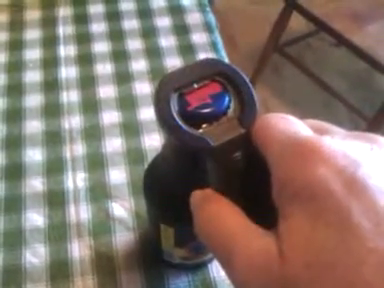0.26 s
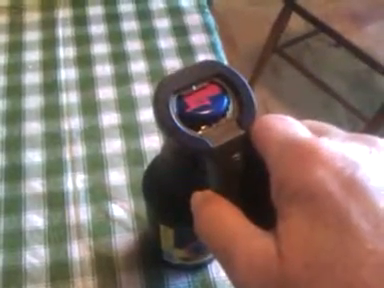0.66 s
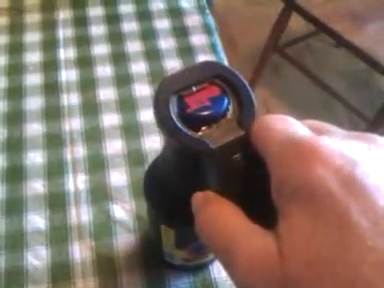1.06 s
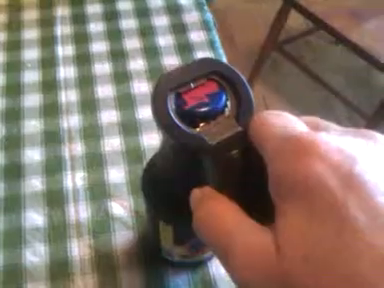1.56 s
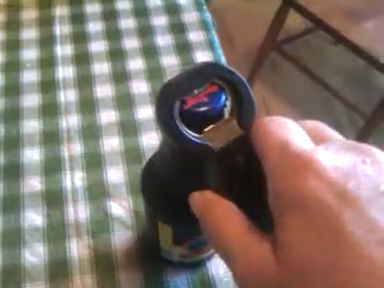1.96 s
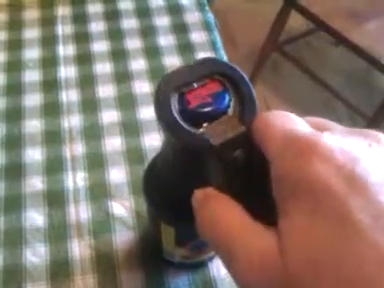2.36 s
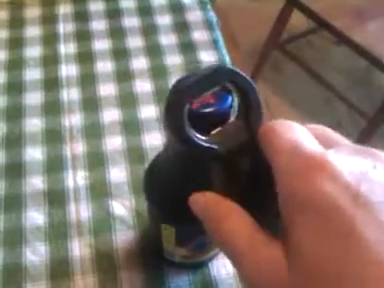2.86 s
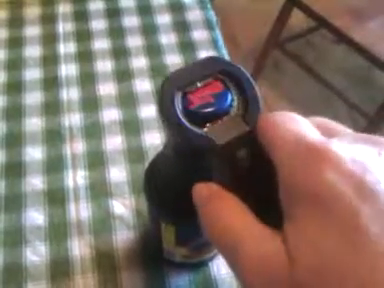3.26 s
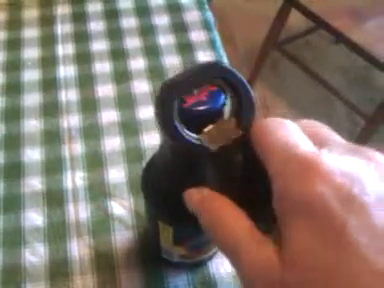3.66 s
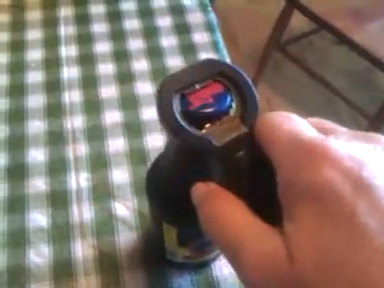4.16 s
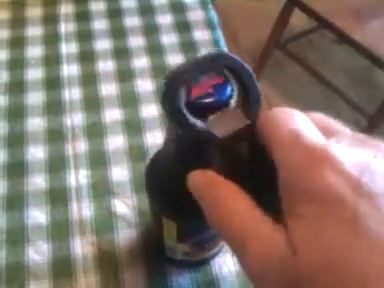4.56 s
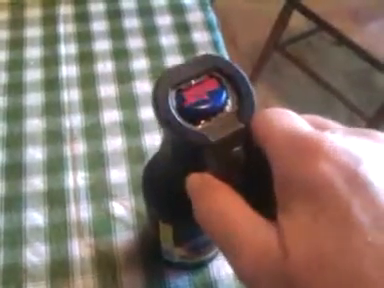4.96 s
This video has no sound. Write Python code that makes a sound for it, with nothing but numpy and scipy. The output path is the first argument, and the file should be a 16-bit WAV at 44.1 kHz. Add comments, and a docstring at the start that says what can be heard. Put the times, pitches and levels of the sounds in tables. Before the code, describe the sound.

Quiet small room, low airy hiss and a faint wavering appliance hum throughout. From 0 to 1.3 s fingers rub the handheld camera right at the microphone: four rough, stuttering strokes at about 0-0.33, 0.46-0.73, 0.78-0.96 and 1.03-1.26 s, with light brushes between. They rasp and buzz with a hollow, nasal resonance near 750 Hz, sometimes turning into a brief hoot. Then near quiet until a soft scrape at 1.85 s. A metal opener touches a bottle's crown cap: scrape at 2.19 and tick at 2.26, tick and longer scrape at 2.74, clicks at 3.15 and a strong one at 3.28, lighter 3.78, clear 4.04, gentle contact and scrape at 4.45-4.58, strong double click at 4.78. Ticks are short, dry and metallic with tiny rebounds, soft table thuds and faint room reflections. Treble is cut above roughly 7 kHz. The cap is never released.

```python
"""A small room lies under a low hiss, and an appliance hums, all built from filtered noise and wavering tones.
Fingers rub four times, with light brushes between, on a hand-held camera close to its microphone:
skin that sticks and slips shakes the shell and the hollow of the case, which at times hoots.
Then a bottle opener scrapes (tiny slips) and ticks (short ringing blows) on the crown cap
of a beer bottle on a table, and the room answers faintly with sparse reflections."""
import sys
import numpy as np
from scipy import signal
from scipy.fft import rfft, irfft
from scipy.io import wavfile
from scipy.ndimage import uniform_filter1d

SR = 44100
rng = np.random.default_rng(int(sys.argv[2]) if len(sys.argv) > 2 else 0)


def to_wav(sig):
    """Store sig (one row per channel, or 1-D mono) as 16-bit WAV at the path in sys.argv[1].

    Samples outside -1..1 are clipped; the rate is SR.
    """
    pcm = np.clip(np.atleast_2d(sig), -1, 1) * 32767
    pcm = np.round(pcm).astype(np.int16)
    wavfile.write(sys.argv[1], SR, pcm.T)  # frames by channels


N = 230510
TIME = np.arange(N) / SR


def amp(db):
    """Turns decibels into a gain."""
    return 10 ** (np.asarray(db) / 20)


def unit(x):
    """Scales a signal to an rms (average strength) of 1."""
    return x / np.sqrt(np.mean(x ** 2) + 1e-20)


def read(points, hz):
    """Reads a table of (Hz, value) between its points, over log frequency."""
    f, value = np.transpose(points)
    return np.interp(np.log(hz + 1), np.log(f + 1), value)


def colour(x, points):
    """Filters a sound by a table of (Hz, dB)."""
    gain = amp(read(points, np.fft.rfftfreq(len(x), 1 / SR)))
    return irfft(rfft(x) * gain, len(x))


def drift(hz):
    """A random wander of rms 1 that moves no faster than about hz."""
    lowpass = 1 + (np.fft.rfftfreq(N, 1 / SR) / hz) ** 4
    return unit(irfft(rfft(rng.standard_normal(N)) / lowpass, N))


def sine(hz, t):
    """A steady pure tone."""
    return np.sin(2 * np.pi * hz * t)


def resonate(x, hz, width):
    """One resonance with a gain of 1 at its peak; a narrow width (Hz) rings longer."""
    return signal.lfilter(*signal.iirpeak(hz, hz / width, SR), x)


def add(mix, s, sound):
    """Lays a sound into the mix at time s (seconds)."""
    part = mix[max(round(s * SR), 0):][:len(sound)]
    part += sound[:len(part)]


def held(x):
    """Friction limits how far a rubbed body can swing, so loud moments are evened out."""
    power = uniform_filter1d(unit(x) ** 2, size=800)
    return unit(x / np.sqrt(0.13 + power))


def slips(rate_hz, jitter, spread_db, fade, grit):
    """Stick and slip: uneven jerks of uneven size, each trailed by a spray of grit (fade in seconds)."""
    turns = np.cumsum(rate_hz * np.exp(jitter * drift(200))) / SR
    sizes = amp(spread_db * np.clip(rng.standard_normal(N), -2, 2))
    # a jerk falls wherever the count of turns passes a whole number
    jerks = np.diff(np.floor(turns), prepend=0) * sizes
    trail = signal.lfilter([1], [1, -np.exp(-1 / (fade * SR))], jerks)
    spray = trail * rng.standard_normal(N)
    return unit(unit(jerks - jerks.mean()) + grit * unit(spray))


def background():
    """Room air, low rumble and microphone hiss are filtered noise; an appliance hums in wavering tones."""
    # Colour of the room air. Each row: frequency in Hz, relative level in dB per Hz.
    air_colour = [(76, -37.5), (130, -24.5), (146, -14.5), (173, -5), (259, -9), (415, -3.5), (453, -6),
                  (940, -11.5), (1580, -11.5), (4000, -22), (5200, -26.5), (8800, -120)]
    # Colour of the microphone hiss. Each row: frequency in Hz, relative level in dB per Hz.
    hiss_colour = [(20, -58), (100, -56), (200, -54.5), (2500, -13), (4100, -8.5), (4500, 0.5), (4750, 4),
                   (5200, -5.5), (5700, -6), (7200, -11.5)]
    # Tones of the appliance. Each row: middle frequency in Hz, middle level in dB.
    hum_tones = [(59.3, -79.5), (84.4, -74.5), (119.5, -78), (183.5, -85.5), (319, -74.5), (421, -80)]
    rumble_colour = [(15, -11.5), (50, -3.5), (110, -13.5), (200, -10.0), (600, -37.5)]

    air = amp(-62) * unit(colour(rng.standard_normal(N), air_colour)) * amp(0.89 * drift(6))
    rumble = amp(-76.5) * unit(colour(rng.standard_normal(N), rumble_colour))
    hiss = amp(-67.0) * unit(colour(rng.standard_normal(N), hiss_colour))
    hum = np.zeros(N)
    for hz, db in hum_tones:
        level = amp(db + 1.0 * drift(2.8)) * np.sqrt(2)
        turns = np.cumsum(hz * (1 + 0.01412 * drift(5.1))) / SR
        hum += level * np.sin(2 * np.pi * turns)
    return air + rumble + hiss + hum


def room(x, decays):
    """Sparse reflections of random sign, each band dying at its own speed."""
    first = TIME[:SR // 2]
    signs = rng.choice([-1., 1.], SR // 2)
    # about 3000 reflections a second, none in the first 5 ms
    taps = signs * (rng.random(SR // 2) < 3000 / SR) * (first > .005)
    hz, t, bands = signal.stft(taps, SR, nperseg=256)
    fading = amp(-60 * t / read(decays, hz)[:, None])
    tail = signal.istft(bands * fading, SR, nperseg=256)[1]
    return signal.fftconvolve(x, tail / np.linalg.norm(tail))[:N]


def contact(cap_hz, knock, rim, edge):
    """Each contact rings the same modes; where the opener lands sets their shares and the pitch of the cap."""
    # Opener, cap and bottle ring together.
    # Each row: frequency in Hz, level in dB before the shares, time to fall by 60 dB in seconds.
    ring_modes = [(296, -13, 0.05), (495, -12.5, 0.023), (639, 0, 0.034), (1190, -10.5, 0.021),
                  (1266, -14, 0.074), (1555, -31, 0.33), (1832, -17, 0.06), (2250, -12, 0.033),
                  (2920, -1, 0.015), (3380, -0.5, 0.021), (3458, -9, 0.024), (3670, 1.5, 0.0049),
                  (5340, -2, 0.007), (6900, 12, 0.0092), (7070, -7, 0.0064)]
    t = np.arange(SR // 3) / SR
    # (Hz, dB): low knock, middle, rim and thin edge
    shares = [(650, knock), (1100, 0.014), (1900, 0.033), (2900, rim), (4000, rim), (6500, edge)]
    modes = list(ring_modes) + [(cap_hz, -1, 0.032)]
    ring = np.zeros(len(t))
    for k, (hz, db, t60) in enumerate(modes):
        # every second mode starts the other way round
        ring += (-1) ** k * amp(db + read(shares, hz) - 60 * t / t60) * sine(hz, t)
    crack = colour(rng.standard_normal(len(t)), shares) * amp(3 - 60 * t / 0.027)
    return (ring + crack) * (1 - np.exp(-t / 0.00027))


def scrapes(catches_per_s=45, catch_db=-6.5):
    """Steel drags over the crimps of the cap in tiny slips and catches, and the opener sings faintly."""
    # The slides of the opener. Each row: start in seconds, length in seconds, level in dB before the singing.
    slides = [(1.85, 0.045, -66), (2.186, 0.062, -60), (2.747, 0.016, -59), (2.756, 0.11, -64),
              (2.988, 0.014, -67), (3.125, 0.009, -57.5), (3.269, 0.011, -57), (3.767, 0.036, -66),
              (3.946, 0.062, -65.5), (4.512, 0.065, -58.5), (4.738, 0.018, -59.5), (4.769, 0.0044, -55)]
    # Colour of the sliding. Each row: frequency in Hz, relative level in dB.
    slide_colour = [(100, -23), (280, 9.5), (600, 14.5), (850, 0), (1300, 12), (1650, 1), (2300, -10),
                    (3300, 0.5), (4100, -8), (5800, -12.5), (7000, -43)]
    stroke = np.zeros(N)
    for s, length, db in slides:
        add(stroke, s, amp(db) * signal.windows.tukey(int(length * SR), .5))
    drive = slips(rate_hz=480, jitter=.5, spread_db=0.5, fade=0.0028, grit=1.2)
    grains = stroke * held(colour(drive, slide_colour))
    singing = 8.3 * resonate(grains, 1625, 22) + 1.8 * resonate(grains, 3450, 90)
    # while it slides, the steel catches on single crimps
    moments = stroke * (rng.random(N) < catches_per_s / SR)
    catches = signal.oaconvolve(moments, contact(1630, 0, -3, -1))[:N]
    return grains + singing + amp(catch_db) * catches


def thud(hz, t60=0.086):
    """The table top answers with a soft, low note (t60: seconds to fall by 60 dB)."""
    t = np.arange(SR // 3) / SR
    return amp(-60 * t / t60) * sine(hz, t) * (1 - np.exp(-t / 0.002))


def ticks(metal_db=3.5, table_lag_s=0.0013, rebound_edge_db=-19):
    """Each blow is a contact, a weaker rebound, and a thud passed down the bottle into the table."""
    # The opener hits the cap and rebounds.
    # Each row: start in seconds, strength in dB (metal_db is added for the metal), pitch of the cap in Hz,
    # pitch of the table in Hz, wait before the rebound in seconds, rebound in dB over the first contact,
    # table thud in dB over the strength, then the shares of low knock, rim and thin edge in dB
    # (rebound_edge_db is added to the edge of the rebound).
    blows = [(2.2572, -49.5, 1640, 322, 0.0035, -17, -20, 3.5, -1.5, -14),
             (2.737, -52.5, 1384, 310, 0.0069, -11, -13, -1.5, -17, -27),
             (3.152, -45, 1610, 266, 0.0022, -7, -6.5, 2, -2, -6.5),
             (3.275, -36, 1236, 292, 0.0061, -12.5, -14, -20.5, -8, -24),
             (3.779, -47.5, 1620, 330, 0.005, -8, -12, -7.5, -7.5, -20.5),
             (4.0392, -41, 1600, 323, 0.0106, -10, -16, -1.5, -3, -18.5),
             (4.453, -51.5, 1475, 288, 0.00393, -12.5, 3.5, 7, -9, -22),
             (4.534, -67, 1590, 285, 0.031, -3, 9.5, 7, -9, -16),
             (4.7785, -37.5, 1297, 241, 0.0127, -1.5, -12, -7.5, -9.5, -2.5)]
    out = np.zeros(N)
    for s, db, cap_hz, table_hz, rebound_s, rebound, table, knock, rim, edge in blows:
        first = contact(cap_hz, knock, rim, edge)
        # the second contact is duller at the thin edge
        second = contact(cap_hz, knock, rim, edge + rebound_edge_db)
        add(out, s, amp(db + metal_db) * first)
        add(out, s + rebound_s, amp(db + metal_db + rebound) * second)
        add(out, s + table_lag_s, amp(db + table) * thud(table_hz))
    return out


def pressure(start, length, rise, sag_db):
    """Gain of one stroke: it rises, holds while sagging, drops as the skin lifts and rings out."""
    t = TIME - start
    after = np.maximum(t - length, 0)
    # the pressure holds at first and eases late in a stroke (a negative sag grows instead)
    hold = amp(-sag_db * np.clip(t / length, 0, 1) ** 3.6)
    # as the skin lifts, the sound drops at once, then dies away by 135 dB a second
    release = np.maximum(np.exp(-after / 0.016), amp(-8.5 - 135 * after))
    return np.clip(t / rise, 0, 1) * hold * release


def rubbing(hollow_sag_db=2, hollow_rise=0.92):
    """All strokes as three controls: gain of the rasp, gain of the hollow, slips a second."""
    # Four full strokes of the fingers with light brushes between them.
    # Each row: start in seconds, length in seconds, rise in seconds (hollow_rise times that for the hollow),
    # rasp in dB, hollow in dB before its overall trim, sag by the end in dB (hollow_sag_db more for the hollow),
    # slips a second at the start, slips a second at the end.
    strokes = [(-0.02, 0.35, 0.025, -37.5, -36, 0.5, 250, 165),
               (0.368, 0.038, 0.026, -48.5, -43, 0, 200, 198),
               (0.463, 0.269, 0.062, -36.5, -33.5, 8, 280, 264),
               (0.742, 0.031, 0.015, -56, -48.5, -3.5, 200, 200),
               (0.782, 0.176, 0.036, -39.5, -34, -2.4, 170, 155),
               (1.032, 0.226, 0.038, -40, -35, -0.5, 235, 205),
               (1.262, 0.074, 0.0093, -49, -49.5, 9.5, 280, 234)]
    rasp, hollow = np.zeros(N), np.zeros(N)
    rate = np.full(N, float(strokes[0][6]))
    for start, length, rise, rasp_db, hollow_db, sag_db, first, last in strokes:
        rasp_stroke = amp(rasp_db) * pressure(start, length, rise, sag_db)
        hollow_stroke = amp(hollow_db) * pressure(start, length, rise * hollow_rise, sag_db + hollow_sag_db)
        rasp, hollow = np.hypot(rasp, rasp_stroke), np.hypot(hollow, hollow_stroke)
        glide = np.interp(TIME, [start, start + length], [first, last])
        rate = np.where(TIME < start, rate, glide)
    return rasp, hollow, rate


def fingers(shell_width_hz=18, inside_db=-1, hollow_trim_db=-1.75, hoot_hz=747.8):
    """Skin slips on the case: a rasp from its shell and a muffled note from its hollow."""
    # Slow slips come regularly, fast ones do not. Each row: slips a second, unevenness from 0 to 1.
    unevenness = [(160, 0.08), (185, 0.3), (240, 0.46)]
    # Colour of the case. Each row: frequency in Hz, relative level in dB per Hz.
    case_colour = [(620, -42.5), (1050, -3), (1320, -7), (1480, -6.5), (1640, -9.5), (1800, -3), (2050, -7),
                   (2570, -3), (2880, 5), (3350, -13), (4560, -16.5), (5340, -32.5), (7000, -39),
                   (9100, -69), (15400, -120)]
    # Narrow modes of the shell. Each row: frequency in Hz, level in dB over the colour of the case.
    shell_modes = [(1497, -1), (1750, -12), (1868, -0.5), (1943, -13), (2137, -4.5), (2254, 2), (2320, 1.5),
                   (2403, 6.5), (2720, 2), (2780, -3.5), (2918, -15), (3092, -6), (3185, -0.5),
                   (4026, -1.5)]
    # Dense ringing inside the case. Each row: frequency in Hz, time to fall by 60 dB in seconds.
    inside_decays = [(1000, 0.23), (5000, 0.62)]
    # Resonances of the hollow. Each row: frequency in Hz, width in Hz, middle level in dB.
    cavity = [(744.7, 29, 5), (869, 10.6, 2.5), (796, 82, -2), (692, 126, -12.5), (1020, 230, -29.5),
              (545, 38.6, -24), (394, 48, -18), (347, 13, -23.5)]
    # The skin locks onto the hollow and hoots. Each row: start in seconds, length in seconds, level in dB.
    hoots = [(0.074, 0.056, -29.5), (0.611, 0.054, -31), (1.045, 0.01413, -33), (1.165, 0.042, -32.5)]

    rasp_gain, hollow_gain, rate_hz = rubbing()
    uneven = read(unevenness, rate_hz)
    drive = slips(rate_hz, uneven, spread_db=1.6, fade=0.011, grit=0.4 + 3.2 * uneven)

    shell = colour(drive, case_colour)
    modes = sum(amp(db) * resonate(shell, hz, shell_width_hz) for hz, db in shell_modes)
    shell = held(shell + modes + amp(inside_db) * room(shell, inside_decays))

    hollow = np.zeros(N)
    for hz, width, db in cavity:
        # the shifting fingers favour now one resonance of the hollow, now another
        favour = amp(db + 3.6 * drift(29))
        # a second, wider resonance trims the skirts of the first
        hollow += favour * resonate(resonate(drive, hz, width), hz, 6 * width)
    hollow = held(hollow)

    hoot, lock = np.zeros(N), np.zeros(N)
    for s, length, db in hoots:
        t = np.arange(int(length * SR)) / SR
        swell = signal.windows.tukey(len(t), .4)
        add(hoot, s, amp(db) * np.sqrt(2) * sine(hoot_hz, t) * swell)
        add(lock, s, swell)
    # while it hoots, the clean note takes the place of part of the rough one
    rough = amp(hollow_trim_db) * hollow * hollow_gain * (1 - 0.19 * lock)
    return shell * rasp_gain + rough + hoot


def scene():
    """The fingers touch the camera itself; the bottle stands out in the room."""
    # How long the room rings. Each row: frequency in Hz, time to fall by 60 dB in seconds.
    room_decays = [(150, 0.75), (500, 0.13), (1500, 0.31), (4000, 0.33), (8000, 0.059)]
    # What the room returns. Each row: frequency in Hz, level in dB.
    wall_colour = [(200, 0.5), (1300, -10), (3000, -13), (7000, -8)]
    bottle = ticks() + scrapes()
    echo = colour(room(bottle, room_decays), wall_colour)
    return (fingers() + bottle + echo + background())[None]


def record(dry):
    """A narrow-band recorder: it cuts the treble steeply and rests slightly off zero."""
    edge_hz, offset = 7350, .001
    lowpass = signal.firwin(511, edge_hz, window=("kaiser", 8), fs=SR)
    return signal.oaconvolve(dry + offset, lowpass[None], "same")


dry = scene()
out = record(dry)
to_wav(out)
```